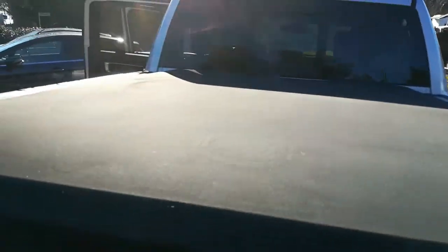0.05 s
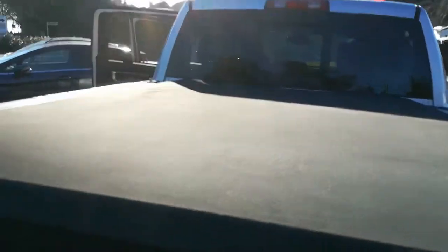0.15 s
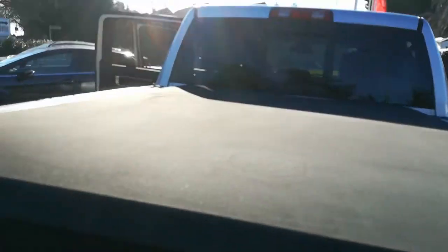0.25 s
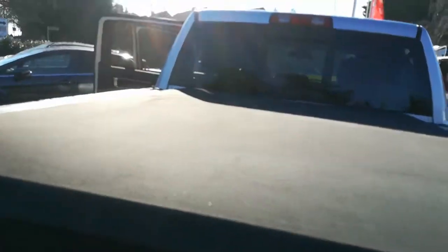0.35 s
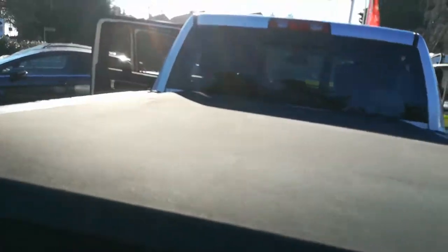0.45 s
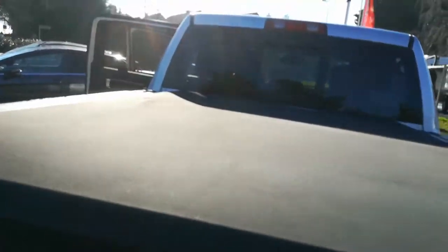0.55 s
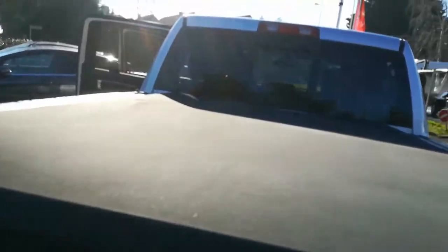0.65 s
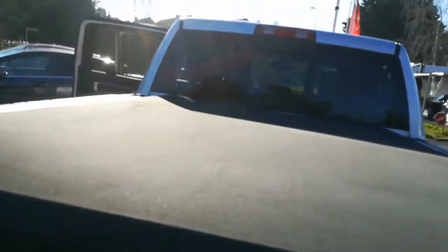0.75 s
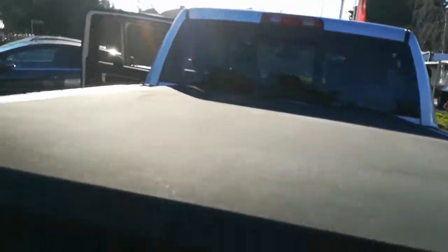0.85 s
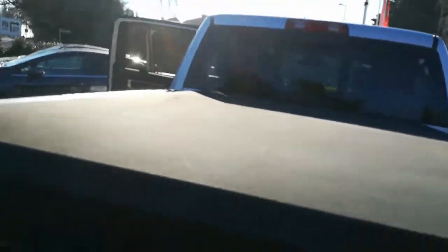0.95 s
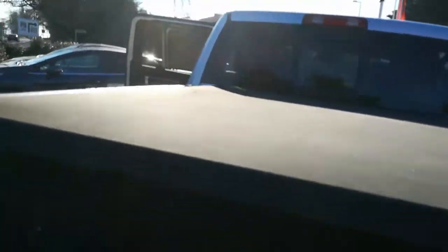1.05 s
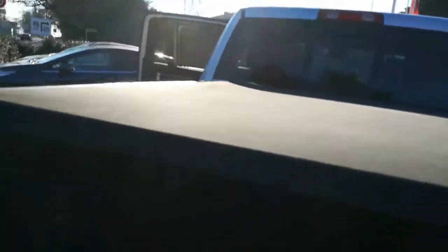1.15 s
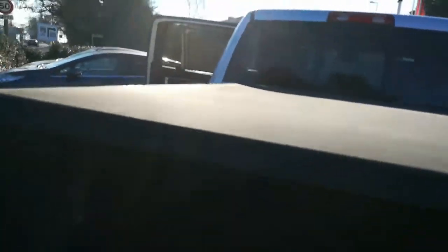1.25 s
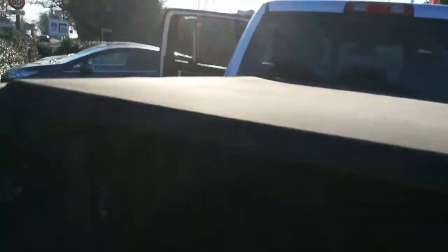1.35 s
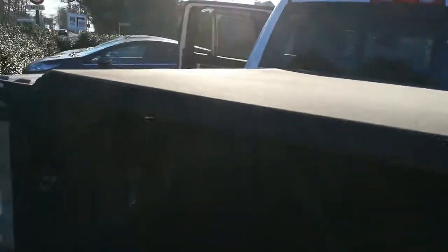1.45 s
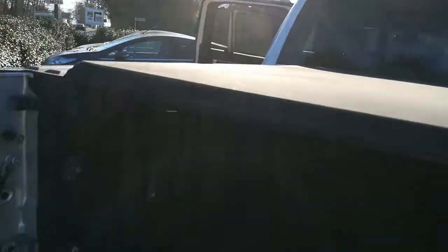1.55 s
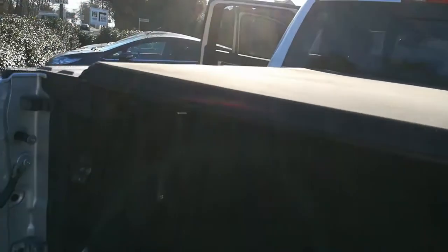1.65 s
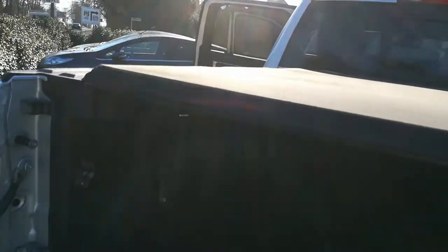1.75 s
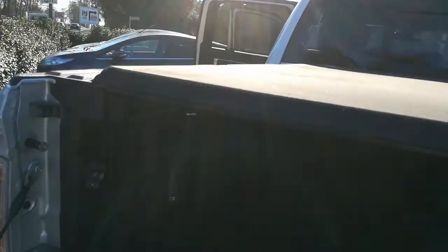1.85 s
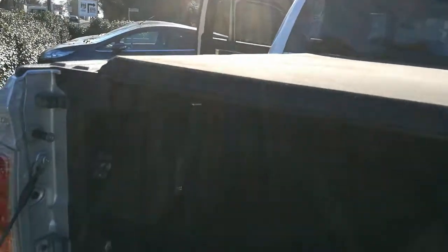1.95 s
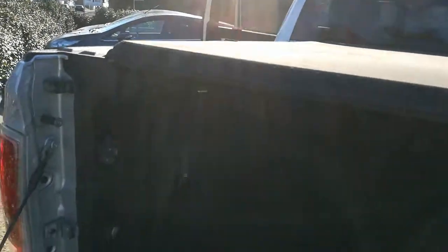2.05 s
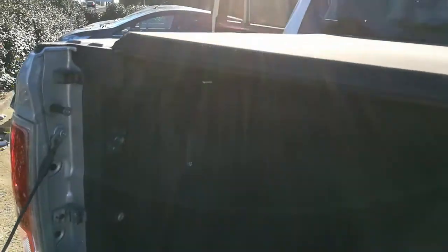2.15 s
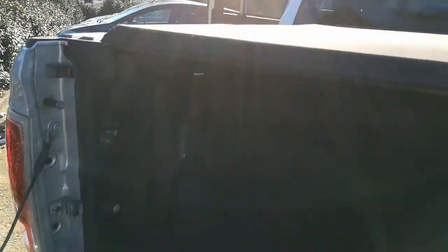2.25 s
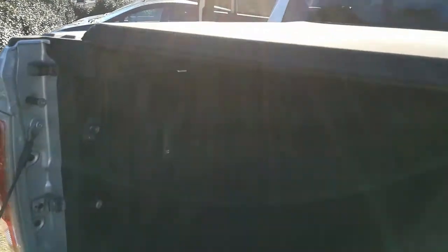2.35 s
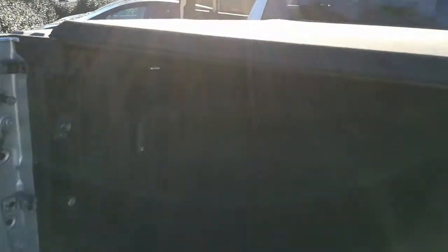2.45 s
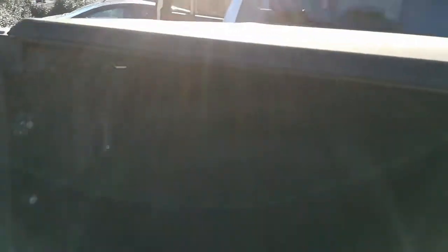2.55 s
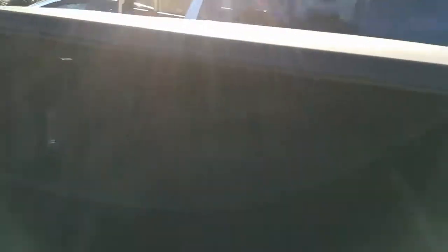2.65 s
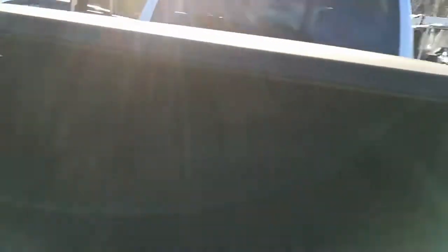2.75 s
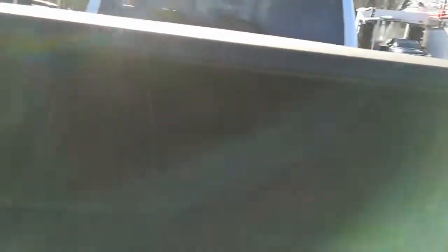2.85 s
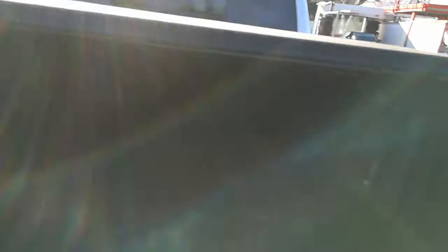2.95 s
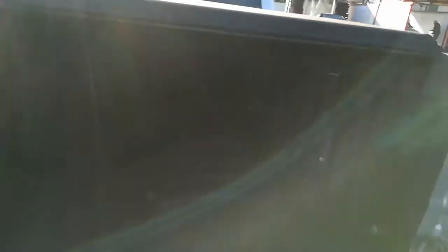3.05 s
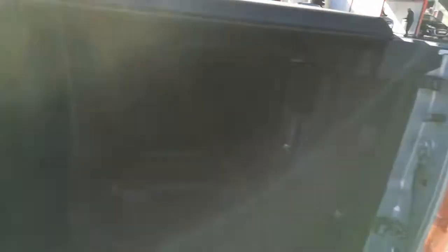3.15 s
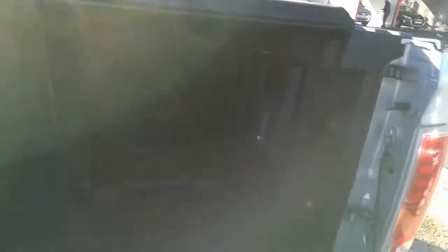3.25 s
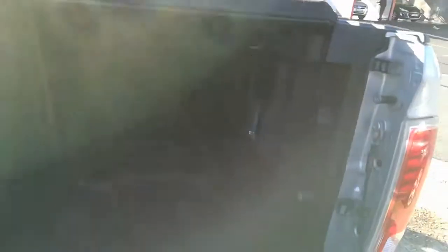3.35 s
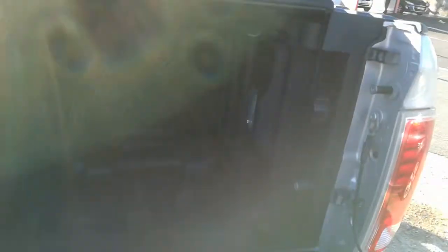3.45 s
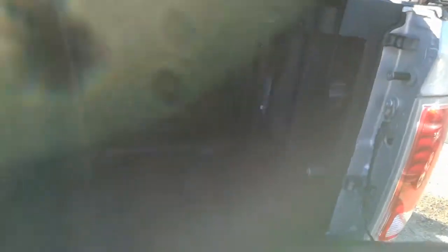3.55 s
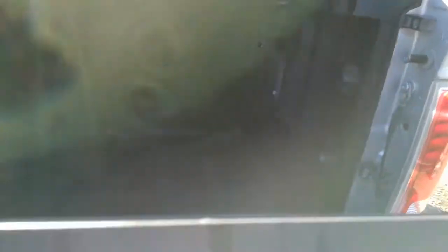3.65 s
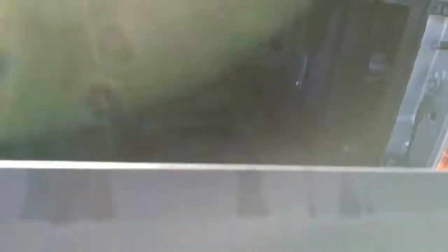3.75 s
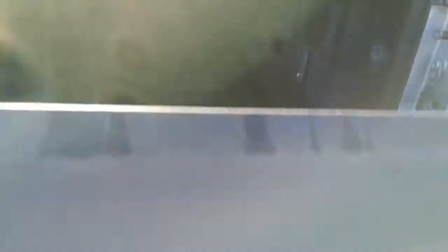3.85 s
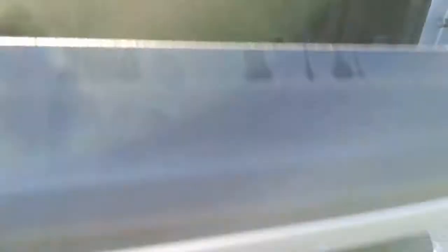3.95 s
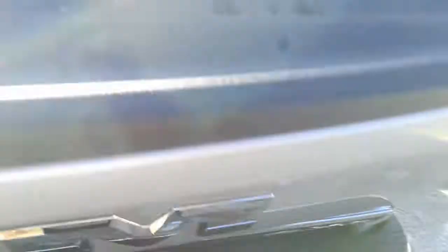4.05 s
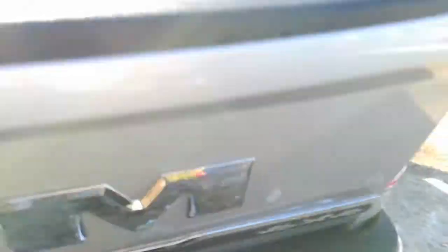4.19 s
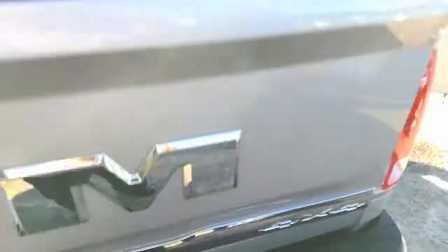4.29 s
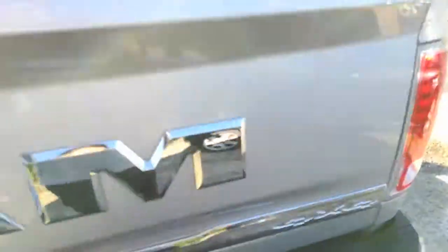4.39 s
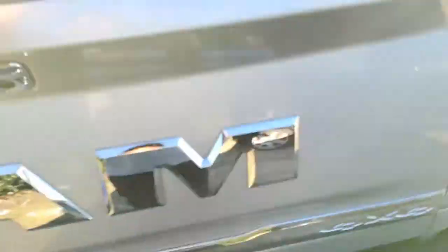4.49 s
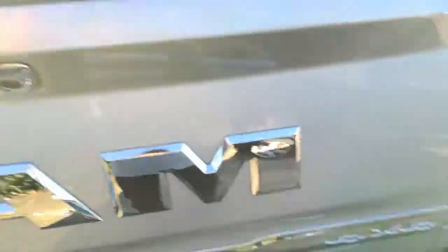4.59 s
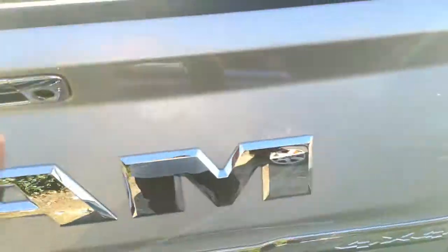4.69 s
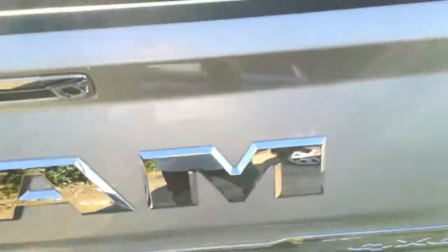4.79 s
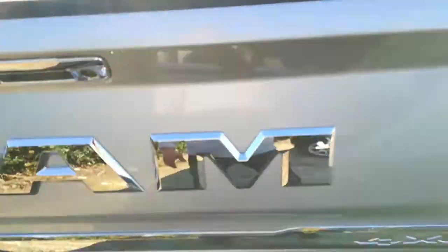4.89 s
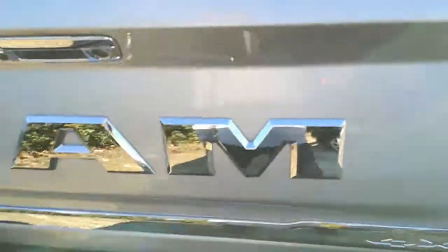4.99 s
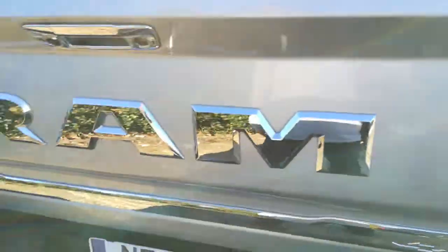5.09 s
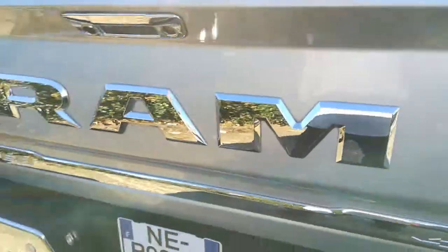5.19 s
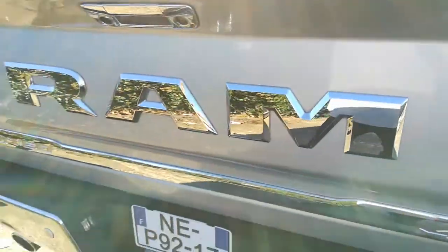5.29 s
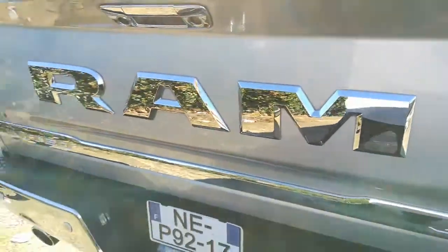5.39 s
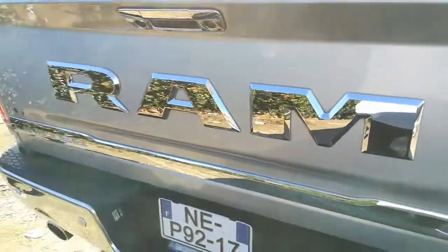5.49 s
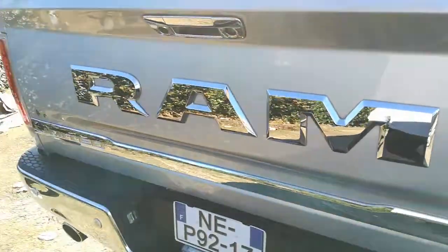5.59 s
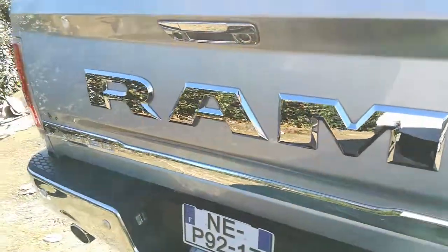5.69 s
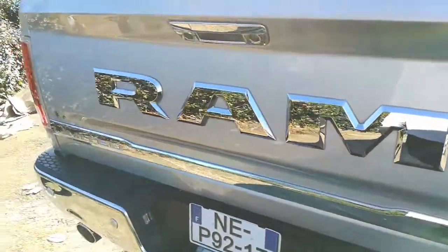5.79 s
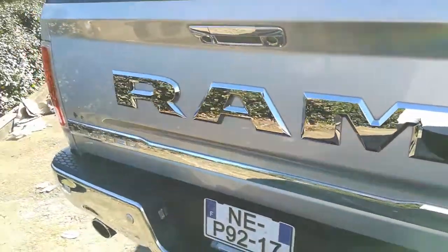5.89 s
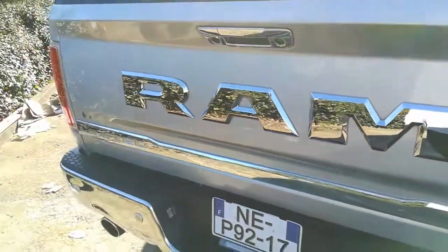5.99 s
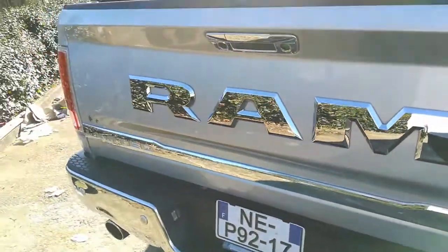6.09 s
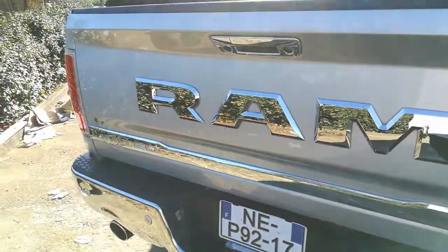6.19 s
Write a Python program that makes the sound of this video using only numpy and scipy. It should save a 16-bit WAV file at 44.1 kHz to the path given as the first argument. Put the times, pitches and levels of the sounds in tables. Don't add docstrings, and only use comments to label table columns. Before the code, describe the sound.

A quiet outdoor yard, heard through a handheld stereo microphone. From 0 s a low, steady traffic rumble swells and sinks, with a faint engine hum near 75 Hz slowly rising and a soft, wide hiss of tyres and wind in leaves. Tiny finger ticks tap at about 0.2, 0.3, 1.4, 2.7, 3.3 and 3.8 s, and a light airy rub passes around 4 s. At 4.36 s the tailgate slams, very loud and close: a dense burst of hard steel latch cracks, strongest until about 4.43 s, over a deep air-pushing thud and hollow sheet-metal ringing. Smaller rattles trail off to about 4.6 s, and the boom decays by roughly 4.9 s. At 5.03 s the sprung handle snaps back with a small, dry, midrange click and very short chatter. Rumble, hum and hiss then continue softly until the end at about 6.2 s.

```python
import sys
import numpy as np
from scipy import signal
from scipy.fft import rfft, irfft, next_fast_len
from scipy.io import wavfile
from scipy.ndimage import uniform_filter1d, map_coordinates

SR = 44100
rng = np.random.default_rng(int(sys.argv[2]) if len(sys.argv) > 2 else 0)


def store_pcm(level_fs):
    pcm = np.round(np.clip(level_fs, -1, 1) * 32767).astype(np.int16)
    wavfile.write(sys.argv[1], SR, np.atleast_2d(pcm).T)


def boost(x):
    u = np.asarray(x, float) / 20
    return 10 ** u


N = 274743
TIME = np.arange(N) / SR


def unit(x):
    return x / np.sqrt(np.mean(x ** 2) + 1e-20)


def along(points, hz):
    point_hz, value = np.transpose(points)
    return np.interp(np.log(hz + 1), np.log(point_hz + 1), value)


def curves(table):
    start_s, *columns = np.transpose(table)
    return [np.interp(TIME, start_s, column) for column in columns]


def swells(rows):
    return sum(db * np.exp(-((TIME - s) / half) ** 2) for s, db, half in rows)


def wobble(rate):
    knots = rng.standard_normal(int(N * rate / SR) + 4)
    return map_coordinates(knots, [TIME * rate])


def filtered(x, response):
    m = next_fast_len(x.shape[-1] + 8192)
    spectrum = rfft(x, m) * response(np.fft.rfftfreq(m, 1 / SR))
    return irfft(spectrum, m)[..., :x.shape[-1]]


def resonant(x, peaks):
    def response(f):
        total = 0
        for k, (centre, width, db) in enumerate(peaks):
            damping = 1j * f * width
            total = total + (-1) ** k * boost(db) * damping / (centre ** 2 - f ** 2 + damping)
        return total
    return filtered(x, response)


def rush(spectrum, patchy_db):
    z = signal.stft(rng.standard_normal((2, N)), nperseg=512)[2]
    field = uniform_filter1d(rng.standard_normal(z.shape[1:]), size=9, axis=0)
    field = uniform_filter1d(field, size=25, axis=1)
    pair = signal.istft(z * boost(patchy_db * unit(field)), nperseg=512)[1][:, :N]
    return unit(filtered(pair, lambda hz: boost(along(spectrum, hz))))


# pitch_hz [Hz], correlation [-1 to 1]
PORT_LIKENESS = [(60, 0.99), (130, 1), (290, 0.88), (640, -0.64), (1410, 0.2), (3100, 0.33), (6820, 0.07),
                 (15000, -0.04)]


def ports(pair, lag):
    def blend(hz):
        angle = np.arccos(np.clip(along(PORT_LIKENESS, hz), -1, 1)) / 2
        return np.array([np.cos(angle), np.sin(angle)])

    def delay(hz):
        return np.exp(-1j * np.pi * hz / SR * lag * np.array([[1], [-1]]))

    mid, side = filtered(pair, blend)
    return filtered(np.array([mid + side, mid - side]), delay)


# pitch_hz [Hz], level_db [dB]
LATCH_COLOUR = [(290, -21.5), (500, -3.5), (687, -19), (958, -4), (1190, -6), (1300, -9), (2280, -5),
                (2490, -4), (3520, -11.5), (5190, -9), (8990, -18.5), (13300, -24.5), (15800, -36)]
# pitch_hz [Hz], width_hz [Hz], lift_db [dB]
LATCH_RINGS = [(910, 30, 8.5), (984, 30, 8), (1193, 40, 8), (2000, 81, 2), (2490, 71, 5), (2660, 45, 0),
               (3750, 96, 1), (4300, 130, 6.5), (5140, 100, 9.5), (6230, 160, 1.5)]


def steel(tilt_db, size):
    rattle = boost(3.1 * unit(uniform_filter1d(rng.standard_normal(size), size=50)))

    def colour(f):
        lift = sum(db / (1 + (2 * (f - hz) / width) ** 2) for hz, width, db in LATCH_RINGS)
        tilt = tilt_db * np.log2(f / 3000 + 1e-3)
        return boost(along(LATCH_COLOUR, f) + lift + tilt)

    return rattle * unit(filtered(rng.standard_normal((2, size)), colour))


# start_s [s], level_db [dB], t60_s [s], tilt_db [dB per octave], pan_db [dB]
CONTACTS = [(4.357, -36, .05, -5, 3), (4.3615, -17.5, 0.063, -2.5, 2), (4.3677, -13.5, 0.033, -1.5, 2.5),
            (4.3845, -16.5, 0.1, -0.5, 9), (4.4, -11.5, 0.073, 4.5, 0.5), (4.407, -19.5, 0.082, -2, 3),
            (4.4188, -18, 0.069, -4.5, 6), (4.4293, -22, 0.092, -3.5, 3), (4.441, -26, .1, -4.5, -5),
            (4.4559, -27.5, 0.17, -0.5, -3), (4.4634, -28, 0.1, -4, -1), (4.481, -32.5, 0.092, -3.5, 6),
            (4.502, -24.5, 0.072, -2, 1.5), (4.515, -31, 0.073, -3, -1), (4.54, -35.5, 0.17, -5.5, -2),
            (4.56, -38.5, .1, -4, -10), (4.577, -38.5, 0.093, -2, -12), (4.69, -42, .02, 11, -7)]
# pitch_hz [Hz], level_db [dB], t60_s [s]
PANEL_MODES = [(87.2, 8.5, 0.52), (119, -11, 0.24), (164.7, 8, 0.58), (216, -7, 0.28), (237, -7, 0.56),
               (292, -2, 0.37), (310, -5, 0.46), (382, -4, 0.44), (478, -22, .3)]
TREBLE_HZ, TREBLE_LIFE = 7000, 0.53
THUD_DB, THUD_LOSS = -22.5, 0.46


def contacts(out, boom, t):
    for start_s, crack_db, t60, tilt_db, pan_db in CONTACTS:
        at = round(start_s * SR)
        pair = steel(tilt_db, size=len(t))
        dull = filtered(pair, lambda f: 1 / (1 + (f / TREBLE_HZ) ** 4))
        treble_decay = boost(-60 * t / t60 * (1 / TREBLE_LIFE - 1.5))
        near, stray = dull + (pair - dull) * treble_decay
        shape = boost(crack_db - 60 * t / t60) * (1 - np.exp(-t / 0.00025))
        far = 0.27 * near + 0.84 * stray
        out[0, at:at + len(t)] += boost(pan_db / 2) * shape * near
        out[1, at + 2:at + 2 + len(t)] += boost(-pan_db / 2) * shape * far
        ring = 0
        for hz, db, life in PANEL_MODES:
            ring = ring + boost(db + rng.normal(0, 2.6) - 60 * t / life) * np.sin(2 * np.pi * hz * t)
        boom[at:at + len(t)] -= boost(crack_db + THUD_DB - THUD_LOSS * tilt_db) * ring


# start_s [s], level_db [dB], pitch_hz [Hz], t60_s [s]
STRUCK_MODES = [(4.3608, -8.5, 115.5, 0.19), (4.363, -13, 215, 0.13), (4.363, -26, 478, .25),
                (4.37, -18, 310, 0.29), (4.371, -12.5, 73.3, .2), (4.4, -21, 233.6, .3),
                (4.415, -11, 165.1, 0.35), (4.421, -21, 287.7, 0.23), (4.425, -17, 382, 0.21),
                (4.444, -15.5, 51.6, .28), (4.445, -19.5, 111.3, 0.47), (4.501, -18.5, 150, 0.25),
                (4.551, -22.5, 128.3, 0.22), (4.6, -27.5, 89.2, 0.43), (4.62, -23, 32.08, 0.17)]
SWELL_S, SWELL_GROWS = 0.00077, 0.069


def struck_modes(boom, t):
    for start_s, db, hz, t60 in STRUCK_MODES:
        swell_s = SWELL_S + SWELL_GROWS * (start_s - STRUCK_MODES[0][0])
        shape = boost(db - 60 * t / t60) * (1 - np.exp(-t / swell_s))
        boom[round(start_s * SR):][:len(t)] -= shape * np.sin(2 * np.pi * hz * t)


# start_s [s], level_db [dB], pitch_hz [Hz], time to full swing_s [s]
GATE_HEAVES = [
    (4.3975, -6, 47.5, .0195),
    (4.548, -17.5, 42, .021),
    (4.3495, -24, 60, .011),
]


def gate_heaves(boom, t):
    for start_s, db, hz, swing_s in GATE_HEAVES:
        shape = (t / swing_s * np.exp(1 - t / swing_s)) ** 4
        boom[round(start_s * SR):][:len(t)] -= boost(db) * shape * np.sin(2 * np.pi * hz * t)


# pitch_hz [Hz], level_db [dB]
SHEET_COLOUR = [(120, -23), (200, -1), (358, -9), (390, -18), (463, -11.5), (675, -24), (919, -15),
                (1510, -20), (2800, -18), (4370, -30), (4920, -23), (6260, -26), (12000, -47), (15600, -75),
                (22000, -120)]
# pitch_hz [Hz], t60_s [s]
SHEET_DECAY = [(80, 1), (300, 0.62), (1000, 0.47), (4000, 0.43), (10000, 0.25)]


def sheet_wash(t):
    hz, frame_s, z = signal.stft(rng.standard_normal((2, SR // 2)), SR, nperseg=512)
    level_db = along(SHEET_COLOUR, hz)[:, None] - 60 * frame_s / along(SHEET_DECAY, hz)[:, None]
    wash = signal.istft(z * boost(level_db), SR, nperseg=512)[1][:, :len(t)]
    return ports(boost(-25) * unit(wash) * (1 - np.exp(-t / 0.018)), lag=-12.5)


# pitch_hz [Hz], left minus right level_db [dB]
SLAM_LEAN = [(60, 0), (110, 0.0), (200, 0), (380, 0), (700, -1), (1290, -1), (2380, -4.5), (4400, -4),
             (8120, 6.5), (15000, -2)]


def slam():
    out, boom = np.zeros((2, N + SR)), np.zeros(N + SR)
    t = np.arange(SR // 2) / SR
    contacts(out, boom, t)
    struck_modes(boom, t)
    gate_heaves(boom, t)
    out[:, round(CONTACTS[1][0] * SR):][:, :len(t)] += sheet_wash(t)
    both = out[:, :N] + ports(np.array([boom[:N], boom[:N] * 0.15]), lag=-12)
    return filtered(both, lambda hz: boost(along(SLAM_LEAN, hz) * np.array([[0.5], [-0.5]])))


# start_s [s], level_db [dB]
HANDLE_CONTACTS = [(5.0342, -18), (5.0352, -16.5), (5.036, -16), (5.042, -28)]
# pitch_hz [Hz], width_hz [Hz], level_db [dB]
HANDLE_RINGS = [(696, 160, -8), (1210, 230, 0), (1688, 200, 4.5), (2470, 380, 8), (3150, 630, 5),
                (5240, 2700, -13)]
CHATTER_S, CHATTER_DB, CHATTER_T60 = 5.038, -28.5, 0.096


def handle():
    decay_db = CHATTER_DB - 60 * np.abs(TIME - CHATTER_S) / CHATTER_T60
    force = (TIME >= CHATTER_S) * boost(decay_db) * rng.standard_normal((2, N))
    for start_s, db in HANDLE_CONTACTS:
        at = round(start_s * SR)
        force[[0, 1], [at, at + 4]] += boost(db + 14.5)
    soft = filtered(force, lambda hz: 1 / (1 + 1j * hz / 6000))
    return resonant(soft, HANDLE_RINGS) * boost([[-2.5], [2.5]])


# centre_s [s], pitch_hz [Hz], level_db [dB], half length_s [s]
RUBBINGS = [(0.219, 6930, -54, 0.25), (.3, 10600, -64.5, 0.2), (.35, 14500, -75.5, .15),
            (.45, 3940, -55, 0.42), (.8, 4240, -51, 0.1), (.95, 7260, -60, .12), (1.79, 990, -48, 0.014),
            (3.29, 1010, -53, .022), (3.525, 2420, -50, .03), (3.83, 3500, -56, .03),
            (3.98, 5500, -47.5, 0.098), (4.0, 11500, -66, .083), (4.369, 4300, -15, 0.003),
            (4.369, 6200, -20, 0.0023), (4.388, 13500, -28, .003), (6.1, 785, -58, 0.11)]
RUB_WIDTH = 0.15


def rubs():
    out, t = np.zeros((2, N + SR)), np.arange(SR) / SR - 0.5
    for centre_s, hz, db, half_s in RUBBINGS:
        noise = rng.standard_normal((2, SR))
        band = unit(filtered(noise, lambda f: np.exp(-((f / hz - 1) / RUB_WIDTH) ** 2)))
        out[:, round(centre_s * SR):][:, :SR] += band * boost(db) * np.exp(-(t / half_s) ** 2)
    return out[:, SR // 2:][:, :N]


# start_s [s], level_db [dB], pitch_hz [Hz]
SMALL_TICKS = [(.1785, -20, 5000), (.305, -22, 4800), (1.38, -16, 800), (1.47, -40, 9000),
               (2.696, -35, 11000), (3.301, -37, 11000), (3.7645, -15, 2000), (4.5598, -23, 7500),
               (5.0346, -13, 5000), (5.043, -19, 4300)]


def ticks():
    out, t = np.zeros((2, N)), np.arange(SR // 20) / SR
    for start_s, db, hz in SMALL_TICKS:
        scratch = boost(-21 - 60 * t / 0.0072) * rng.standard_normal((2, len(t)))
        force = boost(db) * (scratch + (t == 0))
        peak = [(hz, 1.4 * hz, 0)]
        out[:, round(start_s * SR):][:, :len(t)] += resonant(resonant(force, peak), peak)
    return out


# start_s [s], level_db [dB]
WIND = [(0, -54.5), (.29, -56), (.6, -56), (.93, -55), (1.17, -57), (1.93, -56), (2.24, -57.5), (2.56, -56),
        (2.84, -55.5), (2.98, -52.5), (3.48, -52.5), (3.92, -50.5), (4.3, -55), (4.75, -52), (4.99, -53),
        (5.3, -50), (5.55, -50.5), (5.87, -53.5)]
# pitch_hz [Hz], level_db [dB per Hz]
LOWER_HISS = [(1470, -23), (2500, -7.5), (3650, -0.5), (4130, -1.5), (4500, -6.5), (5850, -13.5),
              (9900, -120)]
MIDDLE_HISS = [(2650, -22), (4500, -1.5), (5610, -1), (7000, -6.5), (9100, -35), (15400, -120)]
UPPER_HISS = [(4120, -27), (7000, -2), (8610, -3), (10000, -12.5), (12000, -20), (15600, -45),
              (22000, -120)]
# start_s [s], left lag [samples], pan_db [dB], mirror path_ms [ms]
HAND_PATH = [(0, 9.8, 0, .66), (.8, 7.7, 2.5, 0.5), (1.3, 9.9, 0, 0.83), (2.5, 12.7, -3, 0.84),
             (3.15, 3.9, -1, 1.04), (3.75, 5, -2.5, 0.77), (4.2, 2, -4, 0.81), (4.9, 10.4, -3, 0.98),
             (5.5, 11.8, -3.5, 0.92), (6.23, 13.5, -3, 1.2)]
DIRECT_PER_LAG = 0.026


def leaves():
    wind_db = curves(WIND)[0] + 54
    stray, right = (boost(-54 + 0.46 * wind_db) * rush(LOWER_HISS, patchy_db=1.44)
                    + boost(-51 + wind_db) * rush(MIDDLE_HISS, patchy_db=1.44)
                    + boost(-58 + wind_db) * rush(UPPER_HISS, patchy_db=1.44))
    lag, pan_db, _ = curves(HAND_PATH)
    share = np.clip(DIRECT_PER_LAG * lag, 0, 1)
    late = map_coordinates(right, [np.arange(N) - lag])
    left = np.sqrt(1 - share ** 2) * stray - share * late
    return np.array([left * boost(pan_db / 2), right * boost(-pan_db / 2)])


# pitch_hz [Hz], level_db [dB per Hz]
TYRE_COLOUR = [(200, -42), (400, -6), (650, -2), (1000, 0), (1400, -3.5), (2000, -4.5), (2600, -8),
               (3300, -29), (5500, -120)]
MIRROR_FAR, MIRROR_NEAR, NEAREST_S, APPROACH_S = 0.16, 0.45, 5, 2


def mirrored_tyres():
    path_ms = curves(HAND_PATH)[2]
    strength = MIRROR_FAR + swells([(NEAREST_S, MIRROR_NEAR - MIRROR_FAR, APPROACH_S)])
    direct = rush(TYRE_COLOUR, patchy_db=0.85)
    dull = filtered(direct, lambda hz: 1 / np.sqrt(1 + (hz / 1500) ** 4))
    arrival = np.arange(N) - path_ms * SR / 1000
    reflected = np.array([map_coordinates(port, [arrival]) for port in dull])
    return (direct + strength * reflected) / np.sqrt(1 + strength ** 2)


# pitch_hz [Hz], level_db [dB per Hz]
RUMBLE_COLOUR = [(12, -58), (20, -3), (86, -2.5), (100, -4), (113, -12.5), (151, -8.5), (200, -20),
                 (260, -34), (440, -120)]
DRONE_COLOUR = [(59, -58), (100, -7), (114, -13.5), (161, -9.5), (199, -8), (302, -10), (500, -22),
                (650, -35), (1100, -120)]
# centre_s [s], lift_db [dB], half length_s [s]
LORRY_PASSES = [(0, 7, 0.37), (1.2, 7, .35), (1.92, 5, .15), (2.72, 2.5, 0.21), (3.24, 4.5, 0.12),
                (3.77, -1.5, 0.12), (4.75, 5, 0.11), (5.1, 5, 0.13), (5.95, 2.5, 0.32)]
# centre_s [s], lift_db [dB], half length_s [s]
CAR_PASSES = [(.55, 3.5, 0.42), (1.39, 3.5, 0.16), (2.6, 0.5, 0.17), (3.24, 5, 0.21), (3.85, 6, 0.44),
              (4.75, 4, .1), (5.1, 2, 0.13), (5.6, 3, 0.46), (6.2, 3, 0.27)]
RUMBLE_DB, DRONE_DB, TYRE_DB = -49, -55, -50.5
TYRE_FADE_DB_PER_S, TYRE_SHARE = 0.98, 0.39


def road():
    cars_db = swells(CAR_PASSES)
    tyres = boost(TYRE_DB - TYRE_FADE_DB_PER_S * TIME + TYRE_SHARE * cars_db) * mirrored_tyres()
    rumble_db = RUMBLE_DB + swells(LORRY_PASSES) + 1.2 * wobble(8)
    rumble = boost(rumble_db) * rush(RUMBLE_COLOUR, patchy_db=0.54)
    drone = boost(DRONE_DB + cars_db + wobble(9)) * rush(DRONE_COLOUR, patchy_db=0.3)
    return ports(rumble + drone + tyres, lag=10)


# centre_s [s], lift_db [dB], half length_s [s]
ENGINE_SWELLS = [(.3, 10.5, 0.27), (1.38, 15.5, 0.18), (1.9, 9, 0.58), (2.65, 15.5, 0.58),
                 (3.65, 15.5, 0.5), (4.4, 5, 0.59), (5.05, 11.5, 0.44), (5.7, 15.5, 0.2)]
ENGINE_HZ, CLIMB_HZ_PER_S, SHIFT_S, SHIFT_HZ = 73.45, 3.05, 6.4, 7
IDLE_DB, SECOND_DB = -60.5, -13.5


def engine():
    hz = ENGINE_HZ + CLIMB_HZ_PER_S * TIME - SHIFT_HZ * (TIME > SHIFT_S)
    phase = 2 * np.pi * np.cumsum(hz) / SR + 0.26 * wobble(7)
    level = boost(IDLE_DB + swells(ENGINE_SWELLS) + 0.88 * wobble(4))
    second = boost(SECOND_DB + 3.6 * wobble(4.7)) * np.sin(2 * phase)
    return level * (np.sin(phase) + second)


def scene():
    return slam() + handle() + rubs() + ticks() + leaves() + road() + engine()


# pitch_hz [Hz], level_db [dB per Hz]
SELF_NOISE = [(3000, -40), (9000, -6.5), (12000, -7), (15500, -6), (16000, -40)]


def roll_off(x):
    return signal.sosfilt(signal.butter(12, 16140, fs=SR, output="sos"), x)


def record(dry):
    x = dry + boost(-73.5) * rush(SELF_NOISE, patchy_db=1.5)
    saturated = x / (1 + np.abs(x / 1.05) ** 8) ** (1 / 8)
    mix = filtered(saturated, lambda hz: hz < 15800)
    return roll_off(mix)


dry = scene()
out = record(dry)
store_pcm(out)
```